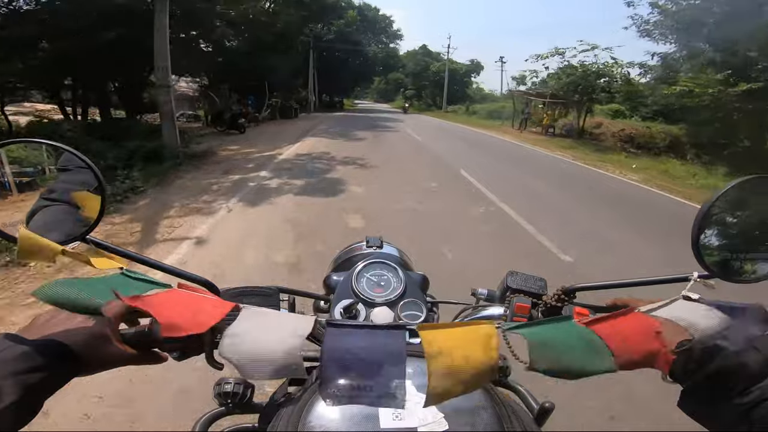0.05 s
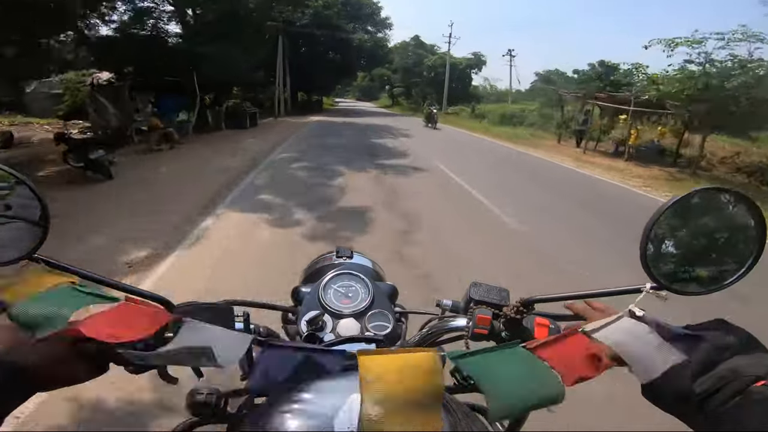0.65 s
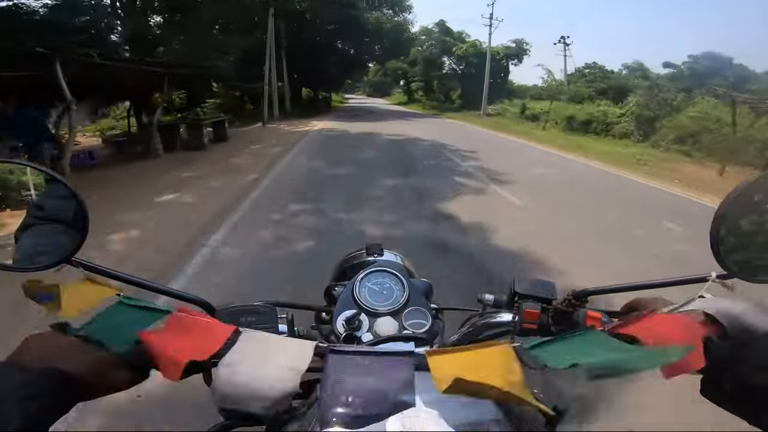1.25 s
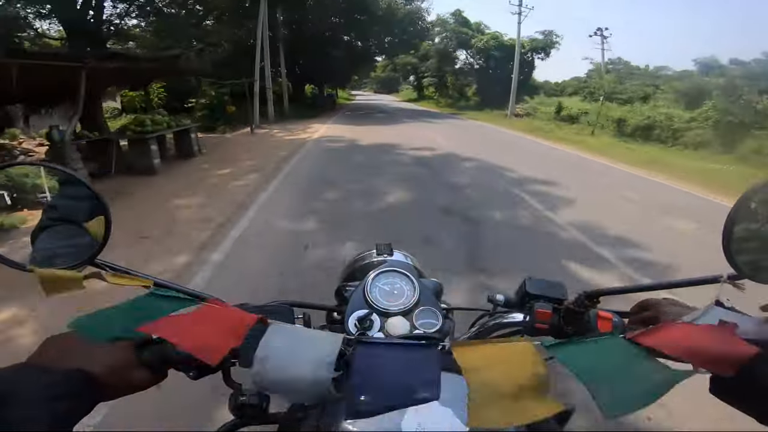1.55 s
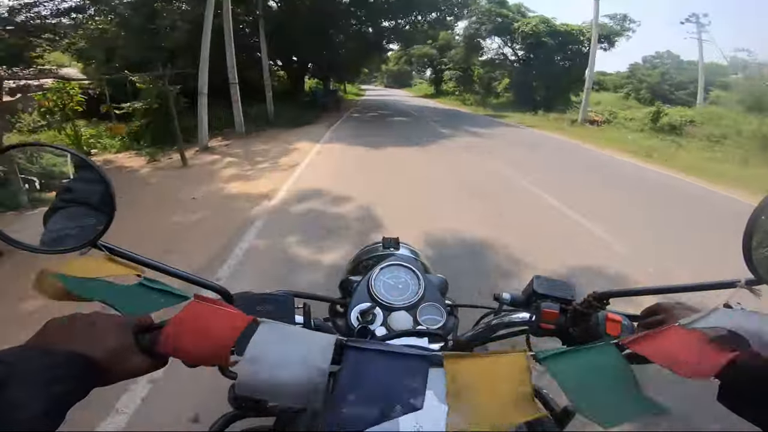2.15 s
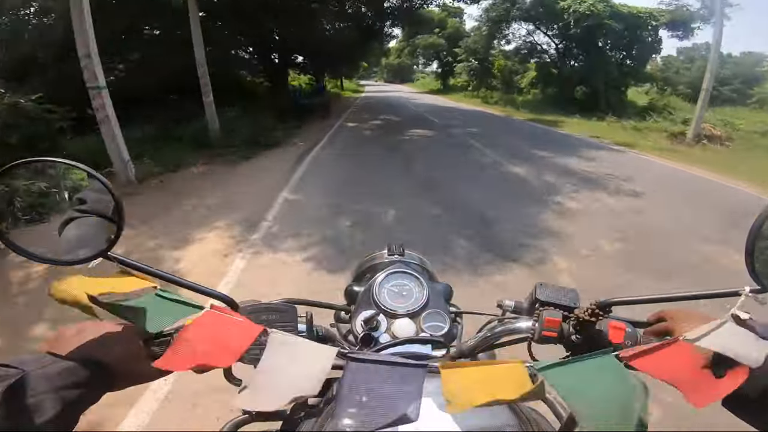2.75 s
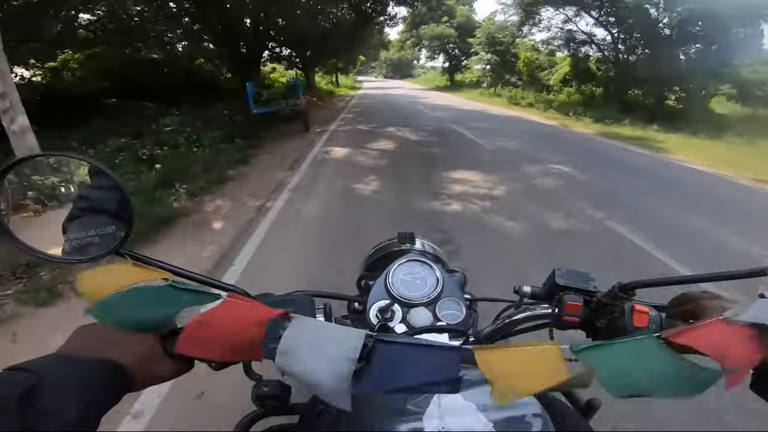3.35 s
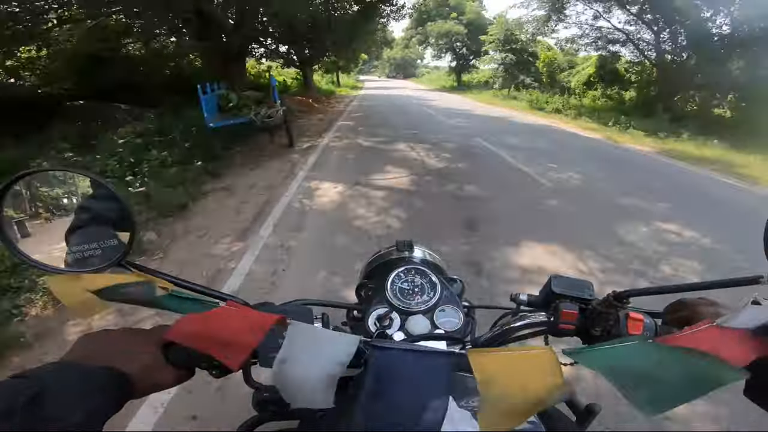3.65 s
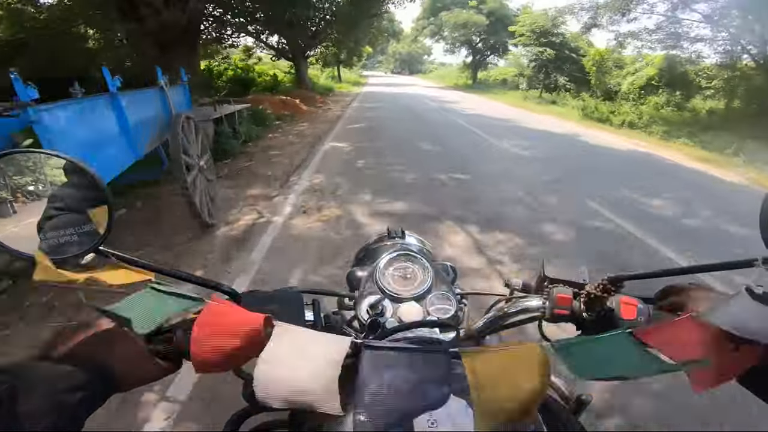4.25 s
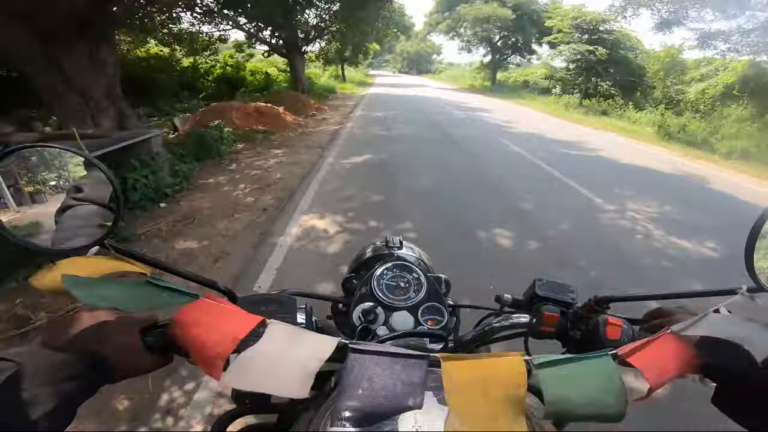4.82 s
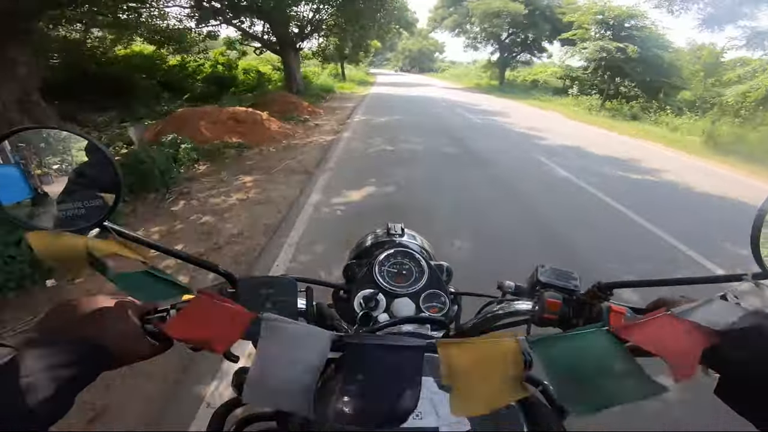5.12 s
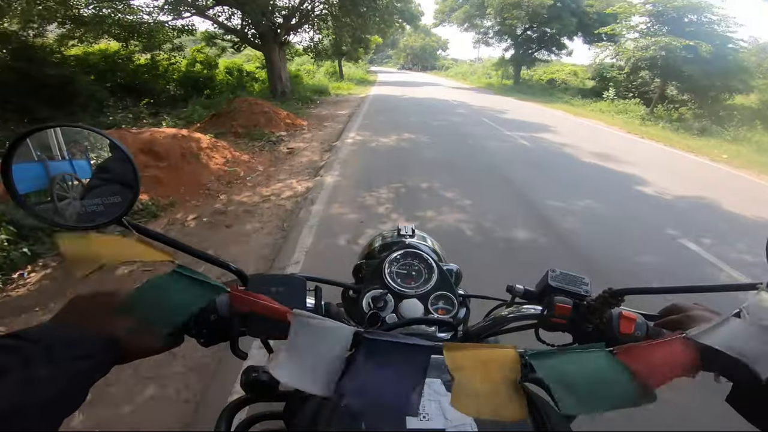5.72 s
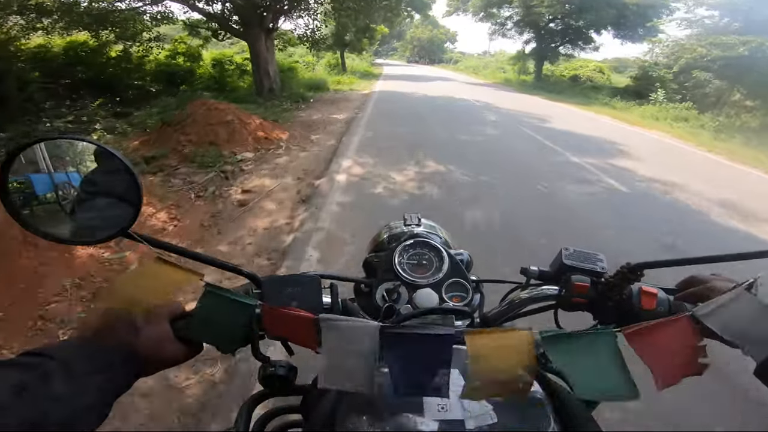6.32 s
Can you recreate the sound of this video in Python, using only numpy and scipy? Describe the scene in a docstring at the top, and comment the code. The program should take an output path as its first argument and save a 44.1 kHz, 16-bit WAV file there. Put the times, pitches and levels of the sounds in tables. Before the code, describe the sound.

Heard from the seat, a motorcycle's rapid thumping slows to an even idle, with gusts of wind and clunking downshifts.

```python
"""On the road, in the rider's seat: a single-cylinder motorcycle rolls off and slows to a thudding idle.
Each engine cycle brings an exhaust thump, frame thuds, piston knocks that ring the crankcase and
ticks from the valve gear. Gear teeth whine down with the revs; on downshifts the lever clicks and
the dogs clunk into the gearbox. Wind and tyre noise fall with road speed, and a faint whistle sinks."""
import sys
import numpy as np
from scipy import signal
from scipy.fft import rfft, irfft, next_fast_len
from scipy.io import wavfile
from scipy.ndimage import map_coordinates

SR = 44100
rng = np.random.default_rng(int(sys.argv[2]) if len(sys.argv) > 2 else 0)


def unload_wav(signal):
    """Save mono or channel-first audio to the path in sys.argv[1] as 16-bit WAV at rate SR, clipped to [-1, 1]."""
    wavfile.write(
        sys.argv[1],
        SR,
        np.round(np.clip(np.atleast_2d(signal).T, -1, 1) * 32767).astype(np.int16),
    )


N = 290222
TIME_S = np.arange(N) / SR
TOP_HZ = 15750
IDLE_HZ, MAX_CYCLES = 8.6, 80


def amp(db):
    """Decibels to gain."""
    return np.exp(np.log(10) / 20 * np.asarray(db))


def unit(x):
    """Scale to rms 1."""
    return x / np.sqrt(np.mean(x ** 2) + 1e-20)


def curves(rows):
    """One per-sample curve for each column after the time."""
    times_s, *columns = np.transpose(rows)
    return [np.interp(TIME_S, times_s, column) for column in columns]


def wobble(rate_hz):
    """Smooth random curve, rate_hz knots a second."""
    knots = rng.standard_normal(int(N * rate_hz / SR) + 4)
    return map_coordinates(knots, [TIME_S * rate_hz])


def body(slope, modes=(), size=16384):
    """Minimum-phase impulse response of energy 1: a spectral slope with resonant peaks."""
    hz = np.fft.rfftfreq(size, 1 / SR)
    slope_hz, slope_db = np.transpose(slope)
    gain = amp(np.interp(np.log(hz + 1), np.log(slope_hz), slope_db))
    power = 1 + sum((amp(abs(db)) ** 2 - 1) / (1 + (2 * (hz - centre_hz) / width_hz) ** 2)
                    for centre_hz, width_hz, db in modes)
    cepstrum = irfft(np.log(gain * np.sqrt(power)))
    cepstrum[1:size // 2] *= 2
    cepstrum[size // 2 + 1:] = 0
    response = irfft(np.exp(rfft(cepstrum)))
    return response / np.linalg.norm(response)


def through(x, slope, modes=()):
    """Ring x in a body."""
    return signal.oaconvolve(x, body(slope, modes))[:N]


def noise(spectrum):
    """Coloured noise of rms 1."""
    return unit(through(rng.standard_normal(N), spectrum))


def whiten(x):
    """Flatten a short sound's spectrum; energy about 1."""
    spectrum = rfft(x, 2 * len(x))
    return irfft(spectrum / np.abs(spectrum))[:len(x)]


def burst(start_s, db, decay_s):
    """One decaying burst of contact noise."""
    t = np.arange(SR // 2) / SR
    out = np.zeros(N)
    out[round(start_s * SR):][:len(t)] = amp(db) * np.exp(-t / decay_s) * rng.standard_normal(len(t))
    return out


def played(hits, sound):
    """Start the same sound at every hit, scaled by its strength."""
    out = np.zeros(N + len(sound))
    for at in np.flatnonzero(hits):
        out[at:at + len(sound)] += hits[at] * sound
    return out[:N]


def throttle(roll_off_s=0.49, closing_s=0.51):
    """Throttle opening, 1 down to 0."""
    return np.clip(1 - (TIME_S - roll_off_s) / closing_s, 0, 1)


def engine_gain(rate_hz, idle_db, doubling_db, open_db):
    """Gain of a part: idle level, plus a step per doubling of revs, plus a step at open throttle."""
    return amp(idle_db + doubling_db * np.log2(rate_hz / IDLE_HZ) + open_db * throttle())


def strikes(cycle, place, scatter_s, scatter_db):
    """One impulse per cycle at the given place, scattered in time and level."""
    timing, strength = rng.standard_normal((MAX_CYCLES, 2)).T
    at = np.interp(np.arange(MAX_CYCLES) + place, cycle, np.arange(N), left=-SR, right=2 * N)
    at = np.round(at + scatter_s * SR * timing).astype(int)
    heard = (at >= 0) & (at < N)
    return np.bincount(at[heard], amp(scatter_db * strength[heard]), N)


def rattle(cycle, rate_hz, contacts, churn, firm_db, scatter_db, repeat_share=0.6):
    """Metal contacts: each a firm hit and a short, partly repeating rattle, over continuous churn."""
    t = np.arange(SR // 10) / SR
    random_power, repeating = churn ** 2, np.zeros(N)
    for place, idle_db, doubling_db, open_db, decay_s in contacts:
        gain = engine_gain(rate_hz, idle_db, doubling_db, open_db)
        hits = gain * strikes(cycle, place, scatter_s=0.0002, scatter_db=scatter_db)
        envelope = np.exp(-t / decay_s)
        envelope_norm = np.sqrt(decay_s * SR / 2)
        pattern = np.sqrt(repeat_share) * whiten(envelope * rng.standard_normal(len(t)))
        repeating += envelope_norm * (amp(firm_db) * hits + played(hits, pattern))
        random_power = random_power + (1 - repeat_share) * played(hits ** 2, envelope ** 2)
    return repeating + np.sqrt(random_power) * rng.standard_normal(N)


def pulses(cycle, rows):
    """Low pressure pulses that swell and die within a few swings."""
    t = np.arange(SR // 8) / SR
    out = np.zeros(N)
    for place, hz, swell_s, db, scatter_s in rows:
        envelope = (t / swell_s * np.exp(1 - t / swell_s)) ** 1.78
        hits = strikes(cycle, place, scatter_s, scatter_db=0.6)
        out += played(hits, amp(db) * envelope * np.sin(2 * np.pi * hz * t))
    return out


def whistle(speed, still_hz=12900, fast_hz=14350):
    """A faint, fuzzy whistle comes and goes, sinking with road speed."""
    hz = still_hz + (fast_hz - still_hz) * speed
    envelope = amp(-71.5 + 2.5 * wobble(7)) * wobble(250)
    return envelope * np.sin(2 * np.pi * np.cumsum(hz + 60 * wobble(60)) / SR)


# Gusts: (time [s], Gaussian sigma [s], rise [dB])
GUSTS = [(.355, 0.15, -1.5), (0.883, .03, 2), (1.095, 0.062, 4), (1.335, 0.084, 5.5), (1.743, 0.045, 4.5),
         (1.947, 0.03, 5), (2.384, 0.06, 7), (2.66, 0.032, 4), (2.793, 0.026, 3), (2.955, 0.041, 4.5)]
# Riding noise spectra: (frequency [Hz], density [dB])
BUFFET_SPECTRUM = [(8, -22.5), (22, 0), (38, 1.5), (55, 0), (80, -14), (170, -19.5), (300, -35), (800, -70),
                   (3000, -100)]
FLUTTER_SPECTRUM = [(25, -28), (55, -1), (75, -1.5), (115, -1), (170, -9), (300, -18.5), (800, -59.5),
                    (3000, -99)]
RUSH_SPECTRUM = [(40, -16), (120, -5), (180, -0.5), (260, -0.5), (380, -6.5), (470, -5), (650, -14.5),
                 (1200, -18), (2500, -33), (6000, -48.5)]
HISS_SPECTRUM = [(500, 19), (2500, 9), (5000, 7.5), (7000, 4), (10000, -1.5), (12000, -3), (13000, -2),
                 (14400, -6.5), (15700, -16)]


def wind(speed):
    """Lumpy buffeting, quicker flutter, the rush of air and tyres and a fine hiss fall with speed."""
    halvings = -np.log2(speed)
    eddies = wobble(22.06)
    gust_db = sum(db * np.exp(-0.5 * ((TIME_S - at_s) / sigma_s) ** 2) for at_s, sigma_s, db in GUSTS)
    buffet = unit(amp(1.5 * eddies) * noise(BUFFET_SPECTRUM))
    flutter = unit(amp(1.5 * eddies) * noise(FLUTTER_SPECTRUM))
    rush = unit(amp(1.02 * eddies + wobble(40)) * noise(RUSH_SPECTRUM))
    hiss = amp(1.5 * wobble(90)) * noise(HISS_SPECTRUM)
    return (amp(-20 - 13 * halvings + gust_db) * buffet
            + amp(-22.5 - 16.5 * halvings + gust_db) * flutter
            + amp(-25.5 - 7.1 * halvings) * rush
            + amp(-43 - 8.1 * halvings) * hiss)


# Lever and selector clicks: (time [s], level [dB], decay [s], centre [Hz], width [octaves])
LEVER_CLICKS = [(1.482, -20, 0.0018, 5500, 3.9), (1.65, -26, 0.0082, 4480, 1.4),
                (2.025, -27.5, 0.0063, 6740, 0.44), (2.425, -33, 0.0049, 6070, 1.7),
                (2.509, -22.5, 0.0096, 5700, 1.5), (2.565, -26.5, 0.01, 3820, 3.2),
                (2.643, -30, 0.0046, 5600, 2)]
# Lever response: (frequency [Hz], gain [dB])
LEVER_SLOPE = [(1000, 4), (2200, 18), (4500, 0), (7500, 3), (10000, -7), (16000, -12)]


def gear_lever():
    """Lever and selector contacts click brightly."""
    clicks = np.zeros(N)
    for start_s, db, decay_s, hz, octaves in LEVER_CLICKS:
        edge_ratio = 2 ** (octaves / 2)
        edges_hz = np.minimum([hz / edge_ratio, hz * edge_ratio], TOP_HZ)
        band = signal.butter(2, edges_hz, "band", fs=SR, output="sos")
        span = slice(round(start_s * SR), round(start_s * SR) + SR // 10)
        clicks[span] += signal.sosfilt(band, burst(start_s, db, decay_s)[span])
    return through(clicks, LEVER_SLOPE)


# Modes of the lever's first snap: (frequency [Hz], level [dB], decay [s])
SNAP_MODES = [(2040, -14, 0.0019), (2500, -14, 0.00072), (4200, -24, 0.00097)]


def lever_snap(start_s=1.4815):
    """A small steel part snaps over and rings briefly."""
    t = np.maximum(TIME_S - start_s, 0)
    return sum(amp(db) * np.exp(-t / decay_s) * np.sin(2 * np.pi * hz * t)
               for hz, db, decay_s in SNAP_MODES)


# Dog impacts: (time [s], level [dB], decay [s])
DOG_CLUNKS = [(1.658, -22, 0.028), (1.675, -19, .005), (2.51, -20.5, 0.0063), (2.565, -11, 0.0042),
              (2.578, -17.5, 0.011), (2.6, -28.5, 0.031), (2.641, -24, 0.0081), (2.67, -26.5, 0.037)]
# Gearbox response: (frequency [Hz], gain [dB])
GEARBOX_SLOPE = [(80, 7), (300, 1), (500, -5), (700, -2.5), (1000, -0.5), (1500, -7), (2500, -18),
                 (5000, -21), (16000, -46)]
# Gearbox resonances: (frequency [Hz], width [Hz], peak [dB])
GEARBOX_MODES = [(479, 38, 13.5), (844, 30, 13), (1245, 35, 10), (1580, 33, 7), (2040, 49, 12),
                 (3260, 110, 7.5)]


def gear_dogs():
    """The dogs drop in and ring the gearbox."""
    clunks = sum(burst(start_s, db, decay_s) for start_s, db, decay_s in DOG_CLUNKS)
    return through(clunks, GEARBOX_SLOPE, GEARBOX_MODES)


# Mesh tones: (order [x firing rate], level [dB], loudest firing rate [Hz], spread [Hz])
GEAR_MESH = [(50.4, -35, 17.7, 1), (58.4, -33.5, 15.7, 0.76), (75.6, -30.5, 17.1, 0.59),
             (76, -40, 14.7, 0.27), (79, -43.5, 19.2, .6), (113, -37, 11.1, 0.49)]


def gear_whine(cycle, rate_hz):
    """Rough mesh tones sink with the crank, each over its own range of revs."""
    out = np.zeros(N)
    for order, db, loudest_hz, spread_hz in GEAR_MESH:
        swell = np.exp(-0.5 * ((rate_hz - loudest_hz) / spread_hz) ** 2)
        jitter_rad = 0.5 * wobble(35) + 0.35 * wobble(220)
        out += amp(db + 2.6 * wobble(130)) * swell * np.sin(2 * np.pi * order * cycle + jitter_rad)
    # teeth press hardest on the power stroke
    return out * amp(4.5 * np.cos(2 * np.pi * (cycle - 0.42)))


# Small ringing parts: (place [cycles], frequency [Hz], level [dB], decay [s])
PART_RINGS = [(.0, 2475, -49.5, 0.0094), (.165, 9700, -55, .0035), (.272, 1430, -34, .004),
              (.425, 5530, -51, 0.0032), (.425, 8150, -55, .004), (.45, 5160, -55, .011),
              (.465, 1296, -34, 0.017), (.47, 2162, -43, 0.0056), (.6, 4880, -53.5, .007),
              (.6, 12900, -60, .004)]


def small_parts(cycle, pitch_scatter=0.012, wander_rad=0.51):
    """Struck tappets, valve seats and covers ring, slightly off pitch from hit to hit."""
    t = np.arange(SR // 12) / SR
    out = np.zeros(N + len(t))
    wander = np.pad(wander_rad * wobble(450), (0, len(t)))
    for place, hz, db, decay_s in PART_RINGS:
        hits = strikes(cycle, place, scatter_s=0.0002, scatter_db=2)
        detunes = pitch_scatter * rng.standard_normal(MAX_CYCLES)
        for at, detune in zip(np.flatnonzero(hits), detunes):
            span = slice(at, at + len(t))
            phase = 2 * np.pi * hz * (1 + detune) * t + wander[span] - wander[at]
            out[span] += amp(db) * hits[at] * np.exp(-t / decay_s) * np.sin(phase)
    return out[:N]


# Valve contacts: (place [cycles], idle [dB], per rev doubling [dB], open throttle [dB], decay [s])
TAPPET_TICKS = [(.05, -7.5, -2.5, 8, .005), (.172, -3.5, 0, -2, 0.003), (0.281, -6, -1, -3, 0.0064),
                (.425, -2, -7, 3, 0.011), (.61, -5, -5.5, -1, 0.01)]
SPRING_TICKS = [(.166, -2, -3, -3, 0.0048), (.295, -2.5, -1, 5, 0.0033), (.428, -2, -4, 8, 0.004),
                (.61, -2, -8, -6, .005), (.73, -8, 3, 4, .004)]
# Part responses: (frequency [Hz], gain [dB])
TAPPET_SLOPE = [(2500, -44), (4000, -7.5), (4850, -2), (5400, -7.5), (6000, -3), (7200, -17), (8300, -13),
                (9500, -19), (16000, -32)]
SPRING_SLOPE = [(3500, -30), (5400, -2), (6800, 0), (8300, -3.5), (10200, -4.5), (13000, -5), (16000, -22)]
FIN_SLOPE = [(3500, -40), (4400, -10), (4545, 6), (4700, -38), (5600, -32)]
# Part resonances: (frequency [Hz], width [Hz], peak [dB, sign ignored])
TAPPET_MODES = [(4100, 90, 6), (4810, 100, 10.5), (4990, 70, 7), (5220, 60, -2), (5720, 110, 6.5),
                (6040, 120, 5)]
SPRING_MODES = [(6900, 130, 7), (7100, 130, -2), (7830, 170, 8), (8220, 110, 10), (8420, 70, 6),
                (8620, 110, 12), (9650, 200, 1), (10200, 200, 7), (12750, 400, 6)]


def valves(cycle, rate_hz):
    """Tappets tick, springs add a bright edge, and under load the cooling fins ring along."""
    ticks = rattle(cycle, rate_hz, TAPPET_TICKS, churn=amp(-18), firm_db=-11, scatter_db=1.2)
    zings = rattle(cycle, rate_hz, SPRING_TICKS, churn=amp(-25), firm_db=-13, scatter_db=1.5)
    tappets = unit(through(ticks, TAPPET_SLOPE, TAPPET_MODES))
    springs = unit(through(zings, SPRING_SLOPE, SPRING_MODES))
    fins = unit(through(ticks, FIN_SLOPE))
    return (engine_gain(rate_hz, idle_db=-59.5, doubling_db=-1.3, open_db=6.4) * tappets
            + engine_gain(rate_hz, idle_db=-66.5, doubling_db=1.5, open_db=2.7) * springs
            + engine_gain(rate_hz, idle_db=-77, doubling_db=9, open_db=12) * fins)


# Pushrod contacts: (place [cycles], idle [dB], per rev doubling [dB], open throttle [dB], decay [s])
ROD_CLICKS = [(.01, -14.5, -16, 8, 0.017), (.275, -5.5, 3, -1, 0.014), (.603, -5, -9, 3, 0.0036)]
# Pushrod response: (frequency [Hz], gain [dB])
ROD_SLOPE = [(1200, -24.5), (2300, 0.5), (2950, -6), (3600, -5.5), (4400, -2.5), (7000, -20)]
# Pushrod resonances: (frequency [Hz], width [Hz], peak [dB])
ROD_MODES = [(2510, 60, 12.4), (2730, 50, 6.5), (2860, 45, 6.7), (3220, 100, 11.6), (3370, 70, 8.4),
             (3530, 70, 5)]


def pushrods(cycle, rate_hz):
    """The pushrods take up their slack with a dry, hard click."""
    clicks = rattle(cycle, rate_hz, ROD_CLICKS, churn=amp(-22), firm_db=-8, scatter_db=1.2)
    gain = engine_gain(rate_hz, idle_db=-57, doubling_db=2, open_db=1.5)
    return gain * unit(through(clicks, ROD_SLOPE, ROD_MODES))


# Head contacts: (place [cycles], idle [dB], per rev doubling [dB], open throttle [dB], decay [s])
HEAD_CLACKS = [(.05, -10, -7, 11, 0.0027), (.27, -4.5, 4, 7, 0.003), (.421, 3.5, 3.5, -11, 0.0032),
               (.492, -2, 7, -2, 0.0047), (.585, -3.5, -2, 11, 0.003), (0.802, -20, -1, 14, 0.0025)]
# Head response: (frequency [Hz], gain [dB])
HEAD_SLOPE = [(300, -15), (1300, 4.5), (2100, 5), (2900, -8.5), (4000, -10), (5200, -20), (7000, -9.5),
              (10000, -21.5), (16000, -27)]
# Head resonances: (frequency [Hz], width [Hz], peak [dB])
HEAD_MODES = [(1906, 51, 5.3), (2003, 37, 16.1), (2103, 53, 14.6), (2280, 45, 7.6), (2500, 50, 3.6),
              (3270, 180, 8.9)]


def cylinder_head(cycle, rate_hz, churn):
    """Metal clacks ring the cylinder head."""
    clacks = rattle(cycle, rate_hz, HEAD_CLACKS, churn, firm_db=-8, scatter_db=0.5)
    gain = engine_gain(rate_hz, idle_db=-49.5, doubling_db=3.3, open_db=2.7)
    return gain * unit(through(clacks, HEAD_SLOPE, HEAD_MODES))


def chatter(cycle, rate_hz, start_hz=477, end_hz=1325, length_s=0.0135):
    """After each firing a loose contact chatters ever faster: a short rising chirp."""
    t = np.arange(int(length_s * SR)) / SR
    chirp = np.sin(np.pi * t / length_s) * signal.chirp(t, start_hz, length_s, end_hz)
    hits = strikes(cycle, place=0.252, scatter_s=0.0003, scatter_db=1)
    return engine_gain(rate_hz, idle_db=-26.5, doubling_db=0.72, open_db=2.8) * played(hits, chirp)


# Piston, crank blows: (place [cycles], idle [dB], per rev doubling [dB], open throttle [dB], decay [s])
PISTON_KNOCKS = [(.0, -12, 8.5, -4, 0.0047), (.115, -9, -2, -2, 0.0059), (0.181, -11, -2, 1, .007),
                 (.275, -4, 4, 1.5, 0.0053), (0.345, -3.5, -2.5, -2, 0.006), (.448, 1.5, -6.5, 1, 0.0055),
                 (0.528, -11.5, 2, 1, 0.0051), (.65, -14.5, 1, 6, .005)]
# Crankcase and fin response: (frequency [Hz], gain [dB])
CASE_SLOPE = [(60, -25), (190, -17.5), (310, -2), (390, -7.5), (480, -0.5), (620, -6), (950, -1.5),
              (1350, -6), (1700, -17.5), (2500, -22.5), (4000, -32.5), (9000, -55), (16000, -51)]
# Crankcase and fin resonances: (frequency [Hz], width [Hz], peak [dB])
CASE_MODES = [(258, 30, 6), (335, 40, 4), (443, 34, 9.5), (530, 60, 3), (712, 28, 10), (765, 22, 5),
              (840, 40, 10.5), (903, 26, 6), (975, 55, 9), (1115, 35, 4), (1292, 55, 12), (1497, 18, 8),
              (1640, 30, 6), (1995, 45, 8)]


def crankcase(cycle, rate_hz, churn, rebound_lag_cycles=0.05, rebound_decay_s=0.0017):
    """Piston and crank blows, each with a loose, uneven rebound, ring the case."""
    t = np.arange(SR // 50) / SR
    blows = unit(rattle(cycle, rate_hz, PISTON_KNOCKS, churn, firm_db=-5, scatter_db=0.8))
    late_hits = sum(amp(db) * strikes(cycle, place + rebound_lag_cycles, scatter_s=0.004, scatter_db=4.5)
                    for place, db, *_ in PISTON_KNOCKS)
    rebounds = unit(played(late_hits, np.exp(-t / rebound_decay_s)) * rng.standard_normal(N))
    gain = engine_gain(rate_hz, idle_db=-34, doubling_db=0.23, open_db=0.34)
    return gain * unit(through(blows + amp(-13.5) * rebounds, CASE_SLOPE, CASE_MODES))


# Frame thuds: (place [cycles], frequency [Hz], swell [s], level [dB], scatter [s])
FRAME_THUDS = [(.328, 303, 0.0043, -10, 0.00039), (0.6, 55, 0.0018, -9, 0.00049),
               (.47, 331, 0.0076, -15.5, 0.00057), (.268, 117, 0.01, -12.5, 0.00036)]


def frame(cycle, rate_hz):
    """The frame thuds after each firing."""
    return engine_gain(rate_hz, idle_db=-13.5, doubling_db=-8, open_db=7.3) * pulses(cycle, FRAME_THUDS)


# Exhaust pulses: (place [cycles], frequency [Hz], swell [s], level [dB], scatter [s])
EXHAUST_PUFFS = [(0.01, 90.6, 0.0093, -2, 0.00012), (.064, 204, 0.003, -14.5, 0.00013),
                 (0.03, 37, 0.016, -14.5, .0005)]
EXHAUST_BARKS = [(.0, 205, 0.0043, -16.5, 0.00015), (.2, 129, 0.0082, -22, 0.00036),
                 (.3, 38.3, 0.015, -17, .0005)]


def exhaust(cycle, rate_hz):
    """Each firing thumps, and barks under throttle; with it shut, faster cycles draw less charge."""
    gain = engine_gain(rate_hz, idle_db=-14, doubling_db=-6.5, open_db=10.8)
    return gain * pulses(cycle, EXHAUST_PUFFS) + throttle() * pulses(cycle, EXHAUST_BARKS)


# Revs: (time [s], firing rate [Hz])
FIRING_RATE = [(0.0, 19.27), (0.5, 19.08), (0.9, 17.43), (1.2, 15.45), (1.6, 13.76), (2.0, 12.55),
               (2.35, 11.3), (2.7, 9.53), (3.0, 8.73), (3.3, 8.6), (3.9, 8.675), (4.5, 8.87), (5.1, 8.546),
               (5.7, 8.277), (6.2, 8.744), (6.58, 8.635)]
# Clatter swells: (time [s], head [dB], valve gear [dB], crankcase [dB])
CLATTER_SWELLS = [(1.5, -1, 1.5, 1), (2.2, 1, -1.5, -0.5), (2.8, -1, -0.5, -1.5), (3.4, 1, 1, 0.5),
                  (4.2, -1, 0, .5), (4.95, -0.5, -0.5, -0.5), (5.3, 4.5, -1.5, 0), (5.7, 3, -3.5, 1),
                  (6.0, -3, -1.5, -1), (6.58, -1, -2, -1.5)]


def engine(recovery_s=0.39):
    """One crank times every part; firings regain strength a moment after the revs drop."""
    rate_hz, = curves(FIRING_RATE)
    head_db, valve_db, case_db = curves(CLATTER_SWELLS)
    cycle = np.cumsum(rate_hz) / SR - 0.113
    lagged_hz = np.interp(TIME_S - recovery_s, TIME_S, rate_hz)
    churn = engine_gain(rate_hz, idle_db=-15.5, doubling_db=0.54, open_db=7.6)
    thumps = exhaust(cycle, lagged_hz) + frame(cycle, lagged_hz)
    knocks = amp(case_db) * crankcase(cycle, rate_hz, churn) + chatter(cycle, rate_hz)
    clacks = amp(head_db) * cylinder_head(cycle, rate_hz, churn)
    whine = gear_whine(cycle, rate_hz)
    ticks = pushrods(cycle, rate_hz) + amp(valve_db) * (valves(cycle, rate_hz) + small_parts(cycle))
    return thumps + knocks + clacks + whine + ticks


# Road speed: (time [s], speed [share of starting speed])
ROAD_SPEED = [(0, 1), (1.3, 0.92), (1.55, 0.79), (2.2, 0.67), (2.95, 0.63), (3.5, 0.53), (4.4, 0.5),
              (5.6, 0.37), (6.58, 0.34)]


def scene():
    """Engine, gearshifts and wind at the rider's chest, mono."""
    speed, = curves(ROAD_SPEED)
    machine = engine() + gear_lever() + gear_dogs() + lever_snap()
    return (machine + wind(speed) + whistle(speed))[None]


def record(dry):
    """Brick-wall low-pass at TOP_HZ."""
    size = next_fast_len(N + SR // 2)
    passband = np.fft.rfftfreq(size, 1 / SR) < TOP_HZ
    return irfft(rfft(dry, size) * passband, size)[..., :N]


dry = scene()
out = record(dry)
unload_wav(out)
```